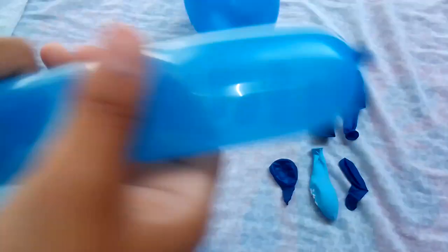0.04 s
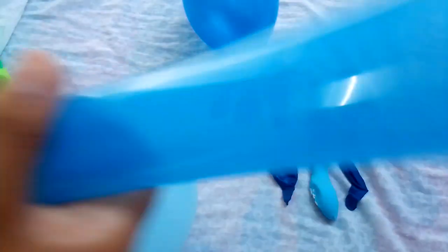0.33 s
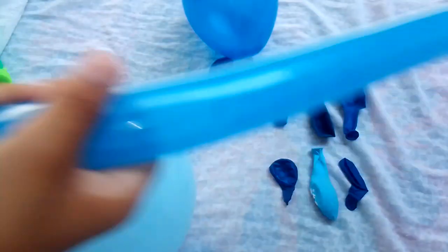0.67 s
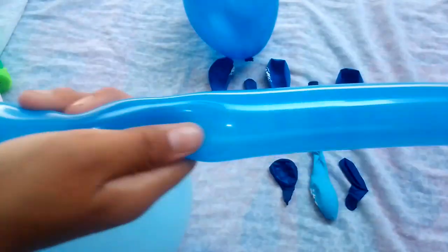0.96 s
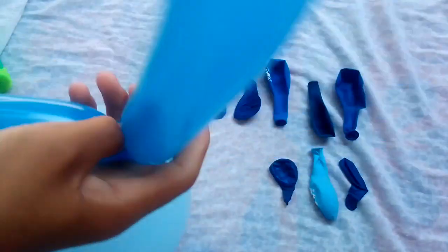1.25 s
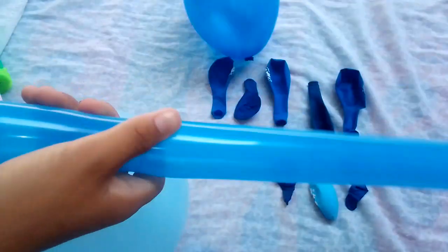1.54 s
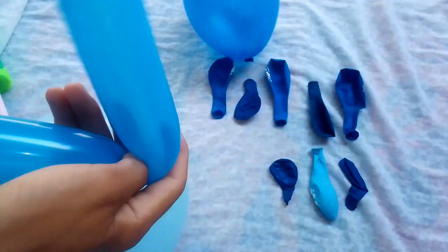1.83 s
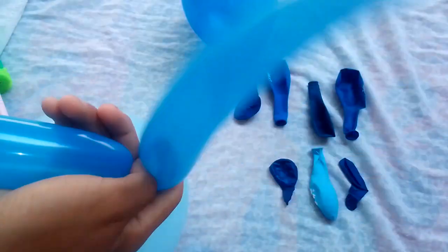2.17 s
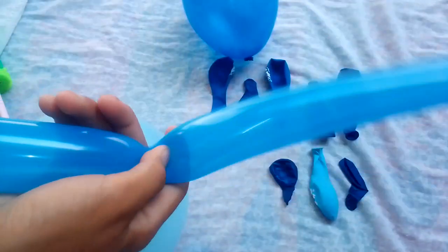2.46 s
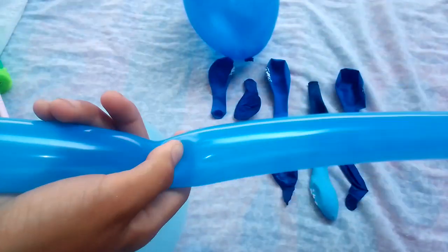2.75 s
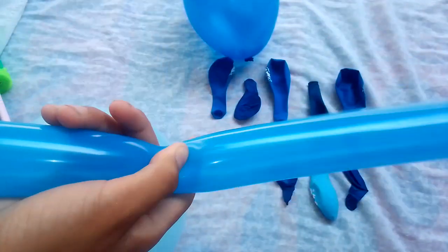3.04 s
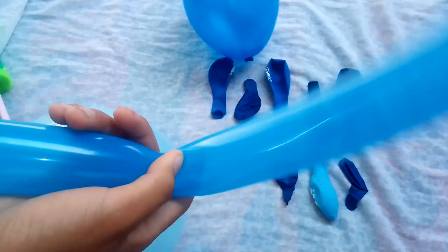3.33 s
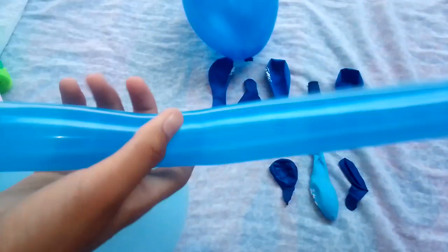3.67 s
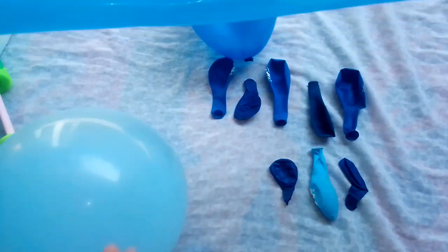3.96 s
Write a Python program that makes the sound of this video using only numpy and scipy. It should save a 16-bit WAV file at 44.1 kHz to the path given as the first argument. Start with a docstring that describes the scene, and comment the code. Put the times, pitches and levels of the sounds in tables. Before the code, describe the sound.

Close rubbing and squeaking of a long balloon, then softer creaks as it is twisted.

```python
"""A hand slides along a long rubber balloon, close to the microphone in a small quiet room.
Stick-slip friction drives the taut skin: dense slips rustle, periodic ones squeal and groan, single
ones snap and slow runs creak; the loudest overload the microphone. From about 1.8 s the hand twists
the balloon, and softer rubs, snaps and creaks ring in the air of the pinched cavity.
Brief squawks, a short room echo and faint background noise are heard throughout."""
import sys
import numpy as np
from scipy import signal
from scipy.fft import rfft, irfft
from scipy.io import wavfile
from scipy.ndimage import uniform_filter1d

SR = 44100
rng = np.random.default_rng(int(sys.argv[2]) if len(sys.argv) > 2 else 0)


def put_to_file(sound):
    """Save the sound as 16-bit audio at rate SR, in the file named by the first command-line argument."""
    columns = np.atleast_2d(sound).T  # one column per channel
    safe = np.clip(columns, -1, 1)
    whole_steps = np.round(safe * 32767)
    wavfile.write(sys.argv[1], SR, whole_steps.astype(np.int16))


N = 176400
T = np.arange(N) / SR


def from_db(db):
    """Amplitude ratio of a level in decibels."""
    return 10 ** (np.asarray(db) / 20)


def unit_rms(x):
    """Normalisation to unit power."""
    return x / np.sqrt(np.mean(x ** 2) + 1e-20)


def wobble(hz):
    """Random modulation: Gaussian values, hz of them a second, joined by straight lines."""
    return np.interp(T * hz, np.arange(N // 8), rng.standard_normal(N // 8))


def envelope(s, db):
    """Amplitude envelope along a level curve, silent outside it."""
    gate = uniform_filter1d(1. * (T >= s[0]) * (T < s[-1]), size=130)
    return from_db(np.interp(T, s, db)) * gate


def response(spectrum, size=2048):
    """Minimum-phase impulse response of a spectrum, by way of its cepstrum."""
    hz, db = np.transpose(spectrum)
    log_hz = np.log(np.fft.rfftfreq(size, 1 / SR) + 1)
    log_gain = np.log(from_db(np.interp(log_hz, np.log(hz), db)))
    cepstrum = irfft(log_gain)[:size // 2]
    cepstrum[0] /= 2
    return irfft(np.exp(2 * rfft(cepstrum, size)))


def convolve(x, impulse):
    """Linear filtering by an impulse response."""
    return signal.fftconvolve(x, impulse)[:N]


def highpass(x, hz):
    """Fourth-order attenuation of the bass."""
    return signal.sosfilt(signal.butter(4, hz, "high", fs=SR, output="sos"), x)


# Spectra of the free skin, its hollow sound and a thin fizz. Each row: frequency in Hz, gain in dB.
FREE_SKIN = [(100, -65), (200, -40), (380, -22), (680, -31), (1100, -17.5), (1450, -19.5), (1950, -14),
             (2400, -10), (3000, -6.5), (3600, 0.5), (4150, -2.5), (4600, -10), (5200, -18), (5900, -36),
             (7500, -47), (16000, -75.5)]
HOLLOW_SPECTRUM = [(80, -33), (180, -20.5), (300, 0.5), (480, 0.5), (700, -3), (1100, -2.5), (1700, 3.5),
                   (2400, -5), (3500, -15), (6000, -32.5), (16000, -68.5)]
FIZZ_SPECTRUM = [(1000, -51.5), (4000, 1.5), (5200, 7.5), (6200, -1), (7100, -7), (8300, -34), (10000, -40),
                 (16000, -44)]
# The fizz swells during the loud rubbing. Each row: time in seconds, relative level in dB.
FIZZ_ENVELOPE = [(.3, -71.5), (.45, -52.5), (.53, -42.5), (.64, -36.5), (.72, -64), (0.782, -41.5),
                 (.89, -53), (1, -79.5), (1.262, -92.5), (1.361, -34), (1.48, -43), (1.58, -32),
                 (1.681, -45.5), (1.77, -58), (1.86, -84.5)]
# One list a stroke. Each row: time in seconds, relative levels of rustle and hollow part in dB.
STROKES = [
    [(0, -31, -58), (.045, -20.5, -46), (.06, -34.5, -41.5), (.12, -41, -51), (.165, -35, -48),
     (.177, -31.5, -45.5), (.19, -26.5, -51.5)],
    [(.2, -32, -59.5), (.24, -30, -56), (.255, -27.5, -42), (.29, -31.5, -44), (.324, -21, -39),
     (.338, -15.5, -39.5), (.347, -21, -47.5), (.37, -41, -52), (.41, -37, -65.5), (.45, -30, -55.5)],
    [(.45, -22.5, -44.5), (.469, -11.5, -37), (.482, -27.5, -67.5), (.5, -20.5, -53), (.52, -23, -64),
     (.55, -30, -38.5), (.572, -14.5, -45.5), (.585, -23.5, -39.5), (.645, -16, -35.5), (.67, -25.5, -41.5),
     (.7, -47, -42), (.745, -48, -54)],
    [(.745, -44.5, -62), (.768, -27.5, -67), (.781, -13, -33), (.805, -27, -36), (.83, -26.5, -57),
     (.85, -32.5, -48.5), (.87, -24, -64), (.895, -21.5, -41.5), (.92, -34, -55), (.965, -36, -50),
     (.985, -54.5, -52)],
    [(1, -47.5, -54.5), (1.03, -30, -48), (1.055, -33.5, -62), (1.075, -26.5, -43), (1.09, -35.5, -48.5),
     (1.14, -34, -73), (1.155, -27, -53), (1.18, -37.5, -67), (1.23, -31.5, -75), (1.265, -35, -82)],
    [(1.265, -31.5, -62), (1.288, -23.5, -43.5), (1.31, -22, -21.5), (1.335, -24.5, -39),
     (1.35, -16.5, -42), (1.385, -21, -25.5), (1.4, -26.5, -31.5), (1.415, -22, -25), (1.445, -20, -28),
     (1.47, -25.5, -37)],
    [(1.47, -29, -35), (1.5, -27, -42.5), (1.54, -22, -39), (1.572, -18.5, -32.5), (1.59, -15, -36.5),
     (1.62, -23.5, -32), (1.632, -16.5, -30.5), (1.645, -26.5, -42.5), (1.665, -34, -53),
     (1.672, -25, -35.5), (1.69, -27, -42), (1.74, -27.5, -49), (1.785, -29, -55), (1.8, -44, -46),
     (1.825, -34, -43.5), (1.87, -87, -50)],
]
def sliding():
    """Sliding friction excites a bright rustle and a hollow part; a thin fizz lies around 4-7 kHz."""
    bright, hollow = np.zeros(N), np.zeros(N)
    for stroke in STROKES:
        s, bright_db, hollow_db = np.transpose(stroke)
        bright += envelope(s, bright_db + 0.47)
        hollow += envelope(s, hollow_db + 1)
    fizz = from_db(2.5) * envelope(*np.transpose(FIZZ_ENVELOPE)) * friction(FIZZ_SPECTRUM)
    return bright * friction(FREE_SKIN) + hollow * friction(HOLLOW_SPECTRUM) + fizz


# Spectra of the tightening skin and a rub's hollow part. Each row: frequency in Hz, gain in dB.
TIGHT_SKIN = [(100, -54.5), (400, -23), (650, -51), (1100, -21.5), (1550, -11), (1900, -7.5), (2400, -11),
              (3000, -3), (3600, 4.5), (4200, 1), (4650, -6.5), (5100, -23), (6200, -38.5), (7500, -48),
              (16000, -85)]
TIGHT_HOLLOW = [(80, -41.5), (190, -34), (330, -5.5), (470, 1), (640, -10.5), (880, -6), (1120, 4.5),
                (1480, -8), (1950, -19.5), (2600, 8.5), (3500, -19), (6000, -34), (16000, -65.5)]
# Rubs. Each row: peak time, rise and fall in seconds, relative bright and hollow levels in dB.
TWIST_RUBS = [(1.97, 0.092, 0.019, -28.5, -42), (2.014, 0.027, 0.077, -29, -43.5),
              (2.106, 0.018, 0.027, -20, -37.5), (2.149, 0.03, 0.029, -26.5, -37),
              (2.325, 0.06, 0.054, -25, -39.5), (2.472, 0.012, 0.022, -27, -43),
              (2.505, 0.014, 0.037, -33, -48.5), (2.685, .04, 0.056, -29.5, -44),
              (2.787, 0.013, 0.026, -41, -77), (2.826, 0.029, 0.039, -33, -52),
              (2.869, 0.0027, 0.019, -36.5, -51), (2.88, 0.014, 0.0078, -31, -40),
              (2.981, 0.093, 0.052, -32.5, -54), (3.116, 0.012, 0.045, -31.5, -70),
              (3.152, 0.008, 0.022, -23.5, -53), (3.174, 0.0088, 0.032, -42, -43),
              (3.272, 0.025, 0.05, -31.5, -68), (3.307, 0.024, 0.044, -37, -47),
              (3.424, 0.05, 0.045, -34.5, -77), (3.465, 0.016, 0.014, -27.5, -50),
              (3.489, 0.011, 0.039, -26.5, -38.5), (3.596, 0.034, 0.028, -32, -49.5),
              (3.739, 0.037, 0.049, -32.5, -78), (3.786, 0.029, 0.03, -22.5, -34),
              (3.823, 0.0033, 0.014, -15, -31.5), (3.852, 0.014, 0.087, -36, -45.5),
              (3.896, 0.014, 0.013, -33.5, -75)]
def twisting(fade_db=16):
    """Friction of skin on skin swells and decays exponentially, by fade_db per rise or fall time."""
    bright, hollow = np.zeros(N), np.zeros(N)
    for s, rise, fall, bright_db, hollow_db in TWIST_RUBS:
        from_peak = np.maximum((s - T) / rise, (T - s) / fall)
        swell = from_db(-fade_db * np.minimum(from_peak, 10))
        bright += from_db(bright_db - 4) * swell
        hollow += from_db(hollow_db - 0.5) * swell
    return bright * friction(TIGHT_SKIN) + hollow * friction(TIGHT_HOLLOW)


def friction(spectrum, slips_per_s=1800, spread_db=2.4, hiss_share=0.14, flutter_db=2, flutter_hz=128.7):
    """Shot noise: dense microslips of uneven size merge over a smooth hiss, at unit power."""
    sizes = from_db(spread_db * np.minimum(rng.exponential(1, N), 3)) * rng.choice([-1, 1], N)
    microslips = unit_rms(sizes * (rng.random(N) < slips_per_s / SR))
    rasp = finger_reflections(microslips + hiss_share * rng.standard_normal(N))
    flutter = from_db(flutter_db * wobble(flutter_hz))
    return unit_rms(convolve(rasp * flutter, response(spectrum)))


def finger_reflections(x, spacing_hz=796.7, wander_octaves=0.343, changes_per_s=45, reflection=0.48):
    """Comb filtering: waves bounce between the moving fingers, so the resonances wander."""
    lag = SR / (spacing_hz * 2 ** (wander_octaves * wobble(changes_per_s)))
    n = np.arange(N)
    return unit_rms(sum(reflection ** k * np.interp(n - k * lag, n, x) for k in range(4)))


# Spectrum of the pinched skin. Each row: frequency in Hz, gain in dB.
PINCHED_SKIN = [(220, -54), (400, -30), (650, -40.5), (1100, -17.5), (1480, -18.5), (1950, -8.5),
                (2400, -9), (3000, -4.5), (3600, 4.5), (4200, 1), (4650, -13.5), (5050, -34), (6200, -40.5),
                (7500, -47.5), (16000, -70.5)]
# Single slips. Each row: time in seconds, relative level in dB.
SNAP_SLIPS = [(0.2099, -6.5), (0.249, -12.5), (.275, -12), (0.325, -7), (0.599, -9), (0.6238, 2), (.634, 3),
              (0.6445, -0.5), (0.6491, 0.5), (0.782, -2.5), (0.797, -15.5), (0.833, -12), (1.0732, -11.5),
              (1.1036, -20), (1.1131, -16), (1.1274, -14), (1.1435, -27), (1.1922, -22.5), (1.2895, -7),
              (1.2933, -5.5), (1.299, -8.5), (1.3054, -1.5), (1.311, -1.5), (1.339, -5), (1.3788, 2),
              (1.3909, 0.5), (1.4106, 2), (1.4822, -7), (1.5105, -7), (1.531, -9), (1.54, -11),
              (1.606, -14), (1.6683, -6), (1.844, -16), (1.904, -12), (1.917, -8), (1.938, -6),
              (1.949, -12), (2.069, -15), (2.2486, -19), (2.2635, -15.5), (2.2955, -9), (2.301, -7.5),
              (2.307, -12), (2.3193, -10.5), (2.342, -21), (2.359, -19.5), (2.396, -27), (2.42, -20.5),
              (2.4405, -27), (2.469, -21), (2.4823, -6.5), (2.6323, -18.5), (2.6482, -13.5), (2.6724, -10),
              (2.6829, -23.5), (2.6916, -13.5), (2.706, -19), (2.74, -28), (2.757, -25), (2.784, -28),
              (2.822, -13.5), (3.009, -21), (3.013, -18), (3.0243, -15.5), (3.1476, -17.5), (3.178, -19.5),
              (3.2449, -23), (3.2542, -18), (3.2606, -17), (3.3256, -18), (3.334, -23.5), (3.426, -22),
              (3.468, -24.5), (3.4834, -14), (3.488, -21.5), (3.5565, -19), (3.5646, -14), (3.573, -18),
              (3.6557, -25.5), (3.674, -25), (3.753, -27), (3.772, -16), (3.81, -19), (3.838, -9),
              (3.9621, -23), (3.977, -31)]
def snaps_and_creaks(pinch_s=1.8):
    """Impulsive excitation: separate slips strike the free skin, and from pinch_s the pinched one."""
    snaps = np.array(SNAP_SLIPS) + [0, -3]  # 3 dB softer
    s, db = np.vstack([snaps, creak_slips()]).T
    free = s < pinch_s
    on_free = slips(s[free], db[free], FREE_SKIN, ripple_s=0.0019, ripple_share=0.16)
    on_pinched = slips(s[~free], db[~free], PINCHED_SKIN, ripple_s=0.00078, ripple_share=0.14)
    return on_free + pinched_cavity(on_pinched)


# Creaks. Each row: start and length in seconds, relative peak in dB, first and last slips per second.
CREAK_RUNS = [(1.3117, 0.021, -4, 248, 233), (1.3425, .031, -3.5, 168, 220), (1.414, .016, -2.5, 170, 250),
              (1.546, 0.034, -4, 187, 230), (1.923, 0.052, -18.5, 183, 263), (2.2714, .02, -15, 155, 190),
              (2.6004, .1, -19, 130, 280), (2.9573, 0.041, -21, 163, 218), (3.267, 0.048, -23.5, 200, 230),
              (3.578, 0.022, -25.5, 178, 250)]
def creak_slips(jitter=0.062, spread_db=1.5, swell_db=4):
    """Relaxation oscillation: times and levels of slips that mostly quicken and are strongest midway."""
    rows = []
    for start, length, peak_db, first_rate, last_rate in CREAK_RUNS:
        progress = 0
        for lateness, strength in rng.standard_normal(size=(40, 2)):
            if progress <= 1:
                db = peak_db - 2.5 + spread_db * strength - swell_db * (2 * progress - 1) ** 2
                rows.append((start + progress * length, db))
                rate = first_rate + (last_rate - first_rate) * progress
                progress += np.exp(jitter * lateness) / (length * rate)
    return np.array(rows)


def slips(s, db, spectrum, ripple_s, ripple_share):
    """Superposition: each slip kicks the skin and leaves a noisy ripple that decays over ripple_s."""
    kicks, skin = np.zeros(N), response(spectrum)
    np.add.at(kicks, np.clip(np.asarray(s) * SR, 0, N - 1).astype(int), from_db(db))
    ripple = signal.lfilter([0, 1], [1, -np.exp(-1 / (ripple_s * SR))], kicks + 1e-18)
    force = kicks + ripple_share * ripple * rng.standard_normal(N)
    return convolve(force, skin / np.abs(skin).max())


# One raspy squeal, then a list for each chirp.
# Each row: time in seconds, pitch in Hz, relative levels of harmonics and added fundamental in dB.
RASPY_CURVE = [(.003, 1087, -25.5, -35), (.022, 981, -17.5, -32), (.033, 1051, -11.5, -24),
               (.043, 1062, -10, -20), (.05, 960, -45, -39), (.06, 780, -51.5, -40.5)]
CHIRP_CURVES = [
    [(.4565, 3990, -34.5, -52), (.4595, 3910, 1.5, -27), (.4645, 3876, -1, -48.5),
     (.4665, 3950, -6.5, -44.5), (.478, 3400, -38, -61)],
    [(.511, 1580, -23.5, -37.5), (.521, 1757, -11, -25.5), (.528, 1984, -9.5, -18),
     (.535, 1956, -4.5, -19.5), (.545, 1975, -8.5, -20), (.558, 1920, -17, -9)],
    [(1.236, 2030, -32, -54), (1.25, 2090, -24.5, -53), (1.26, 2180, -24, -54), (1.268, 2150, -43, -59)],
]
def squeal(curve, jitter, flutter_db, harmonics):
    """Self-excited oscillation: slips lock into a fast cycle whose harmonics sound through the skin."""
    s, hz, db, fundamental_db = np.transpose(curve)
    pitch = np.interp(T, s, hz) * (1 + jitter * wobble(700))
    phase = 2 * np.pi * np.cumsum(pitch) / SR
    cycle = sum(np.cos(k * phase) for k in range(1, harmonics + 1))
    cycle *= from_db(flutter_db * wobble(543.7))
    cycle += from_db(-2) * np.cos(3 * phase) * wobble(900)  # a rough third harmonic gives the edge
    fundamental = envelope(s, fundamental_db) * np.sin(phase)
    return convolve(cycle * envelope(s, db), response(FREE_SKIN)) + fundamental


# One list a groan. Each row: time in seconds, pitch in Hz, relative slip and fundamental levels in dB.
GROAN_CURVES = [
    [(.095, 500, -52, -41), (.11, 430, -35, -41.5), (.13, 374, -51, -58)],
    [(.463, 545, -8, -27), (.47, 505.3, -5.5, -27), (.477, 452.5, -10, -34), (.49, 363, -39, -43)],
    [(.538, 234.7, -53, -44), (.555, 247, -25, -26.5), (.575, 247, -9, -26.5), (.585, 263.3, -14.5, -28),
     (.6, 292, -14, -19), (.617, 292, -18, -19), (.63, 287, -12, -23), (.648, 270, -9, -34),
     (.66, 262, -7, -38)],
]
def groan(curve, jitter=0.03, spread_db=2.2):
    """Slow periodic stick-slip: one slip a cycle, while the whole wall swings at the fundamental."""
    s, hz, db, fundamental_db = np.transpose(curve)
    pitch = np.interp(T, s, hz) * (1 + jitter * wobble(250))
    cycles = np.cumsum(pitch) / SR
    slipping = (np.diff(np.floor(cycles), prepend=0) > 0) & (T > s[0]) & (T < s[-1])
    slip_db = np.interp(T, s, db) - 1.5 + spread_db * rng.standard_normal(N)
    pulses = slips(T[slipping], slip_db[slipping], FREE_SKIN, ripple_s=0.00084, ripple_share=0.2)
    return pulses + envelope(s, fundamental_db) * np.sin(2 * np.pi * cycles)


# Squawks. Each row: peak time and half length in seconds, pitch in Hz, glide in octaves per second,
# bandwidth in Hz, relative level in dB.
SQUAWK_BURSTS = [(.012, 0.0064, 330, -6, 89, -40), (0.212, 0.0059, 1520, 6, 257, -38),
                 (0.218, 0.013, 2145, -1.5, 116.5, -42.5), (0.775, 0.0119, 1560, 13.5, 293.7, -31.5),
                 (0.829, .008, 1625, -1.5, 296, -31), (0.061, .007, 823, -9.5, 121.5, -38.5),
                 (0.571, 0.0088, 734, 0.5, 112.4, -29.5), (1.05, 0.018, 396, -3, 100.2, -45),
                 (1.065, .008, 1360, -10, 248.8, -36), (1.354, .009, 3420, 1, 500, -18.5),
                 (1.357, .013, 761, 2.5, 90.6, -34), (1.396, .0018, 3010, -5, 1306, -15),
                 (1.402, .0018, 2966, -7.5, 1304, -9.5), (1.429, .011, 1540, -5, 200, -31.5),
                 (1.441, .002, 3120, -1.5, 1201, -7), (1.555, .013, 1600, 3, 204.3, -27),
                 (1.571, 0.009, 2230, 10.5, 300, -20.5), (1.57, .009, 3559, -3.5, 702.4, -19),
                 (1.631, .0035, 3300, 0.5, 450, -14), (2.02, 0.011, 3684, 7.5, 399, -32.5),
                 (2.114, 0.014, 1050, -24, 250.8, -40), (2.789, .004, 4190, -1, 450.6, -27.5),
                 (2.87, .005, 4100, -19.5, 611, -28), (2.878, .008, 2250, -3.5, 300, -39),
                 (3.116, .011, 3400, 0, 501, -37.5), (3.15, 0.0058, 2695, -3.5, 500.3, -31),
                 (3.799, 0.01, 359, -7, 79.6, -42.5)]
def squawks():
    """Narrow-band noise: half-locked slips glide, too brief and uneven to settle on a clean pitch."""
    out = np.zeros(N)
    for s, half, hz, glide, width_hz, db in SQUAWK_BURSTS:
        near = np.abs(T - s) < 3 * half
        t = T[near] - s
        phase = 2 * np.pi * np.cumsum(hz * 2 ** (glide * t)) / SR
        tone = wobble(1.7 * width_hz)[near] * np.cos(phase)
        tone += wobble(1.2 * width_hz)[near] * np.sin(phase)
        out[near] += from_db(db + 1) * unit_rms(tone) * np.exp(-(t / half) ** 2)
    return out


# Air modes of the pinched balloon. Each row: frequency in Hz, quality factor, gain in dB.
AIR_MODES = [(426, 8, -12.5), (1153, 10, -3), (1977, 19, -4.5), (2860, 14, -14.5)]
# Dips between the modes. Each row: frequency in Hz, quality factor.
MODE_GAPS = [(660, 2.8), (1500, 6.2)]
def pinched_cavity(x, gap_depth=0.26):
    """Cavity resonance: the enclosed air rings at its modes, is thin between them and has no bass."""
    x = x + sum(from_db(db) * signal.lfilter(*signal.iirpeak(hz, q, fs=SR), x) for hz, q, db in AIR_MODES)
    for hz, q in MODE_GAPS:
        x = x - gap_depth * signal.lfilter(*signal.iirpeak(hz, q, fs=SR), x)
    return highpass(x, hz=260)


def reverberation(x, t60_s, delay_s):
    """Diffuse reflection: dense echoes of unit total energy decay by 60 dB in t60_s."""
    t = T[:SR]
    tail = rng.standard_normal(SR) * from_db(-60 * t / t60_s) * (t > delay_s)
    return convolve(x, tail / np.linalg.norm(tail))


# Spectrum of the quiet room. Each row: frequency in Hz, relative spectral density in dB.
ROOM_SPECTRUM = [(25, -98), (70, -102), (105, -94.5), (160, -112), (320, -84.5), (640, -112), (1100, -98.5),
                 (2000, -97), (3700, -85), (5500, -108), (8000, -114), (16000, -115)]
def room_noise(level_db=-63):
    """Stationary coloured noise forms a faint background."""
    return from_db(level_db) * unit_rms(convolve(rng.standard_normal(N), response(ROOM_SPECTRUM)))


def scene():
    """Sources add: all but the squeals echo in the balloon, then all in a room that holds little bass."""
    balloon = sliding() + pinched_cavity(twisting()) + squawks() + snaps_and_creaks()
    balloon += sum(groan(curve) for curve in GROAN_CURVES)
    balloon += from_db(-13) * reverberation(balloon, t60_s=0.05, delay_s=0.0013)
    balloon += squeal(RASPY_CURVE, jitter=0.018, flutter_db=-1, harmonics=4)
    balloon += sum(squeal(curve, jitter=0.028, flutter_db=2.4, harmonics=3) for curve in CHIRP_CURVES)
    background = room_noise()
    room = from_db(-14) * reverberation(highpass(balloon, hz=400), t60_s=0.37, delay_s=0.0053)
    return (balloon + room + background)[None]


def record(dry):
    """Saturation: the microphone flattens the loudest peaks, and a low-pass cuts the top treble."""
    ceiling, knee, cutoff_hz = 0.72, 17.6, 15900
    clipped = dry / (1 + np.abs(dry / ceiling) ** knee) ** (1 / knee)
    return signal.fftconvolve(clipped, signal.firwin(201, cutoff_hz, fs=SR)[None], "same")


dry = scene()
out = record(dry)
put_to_file(out)
```